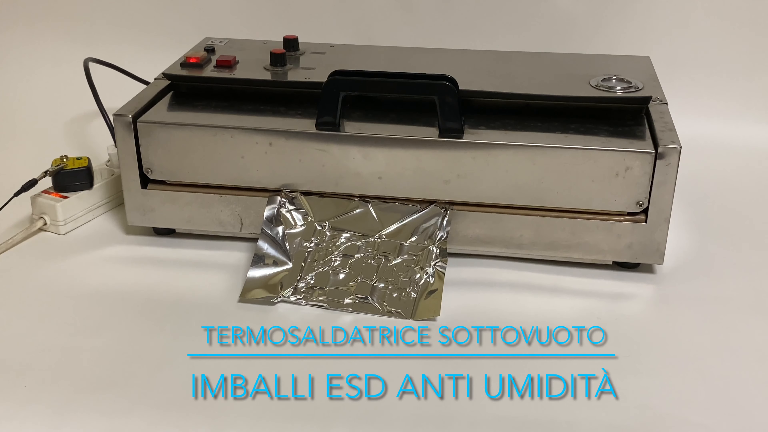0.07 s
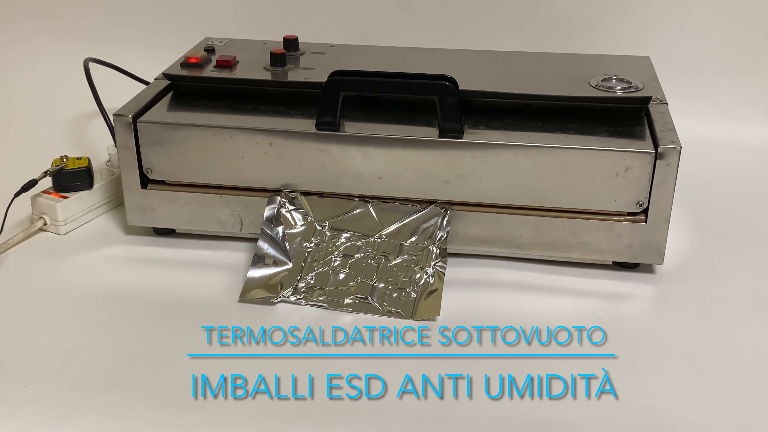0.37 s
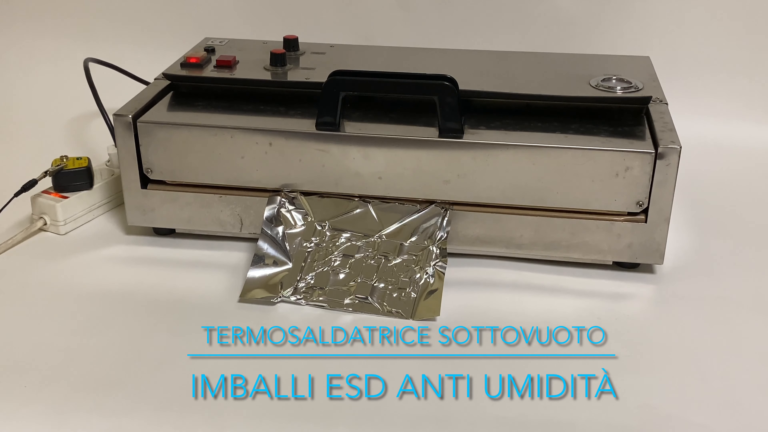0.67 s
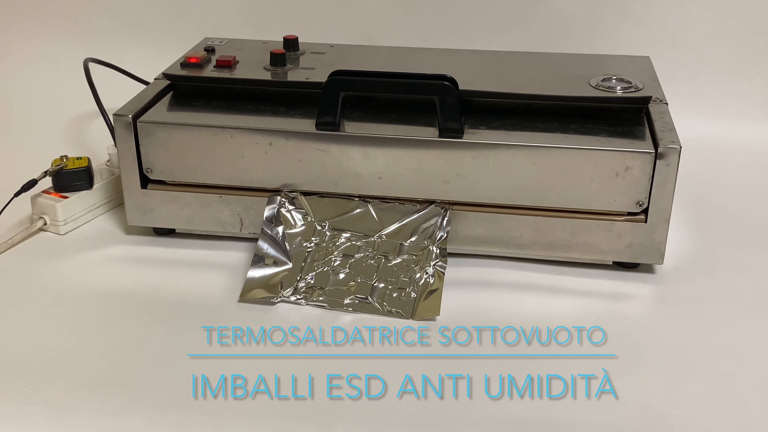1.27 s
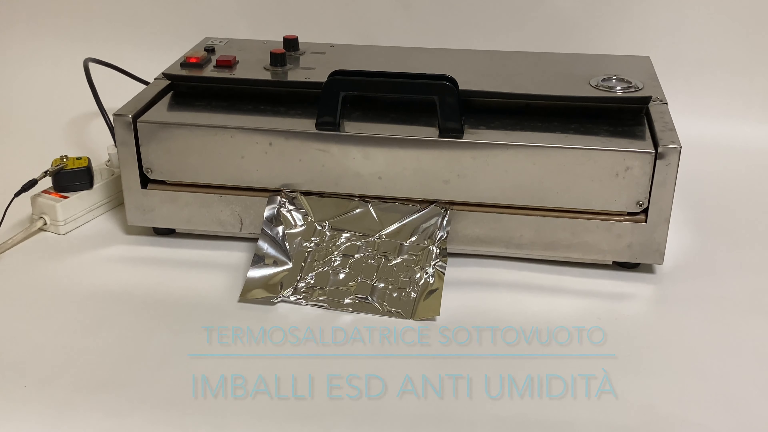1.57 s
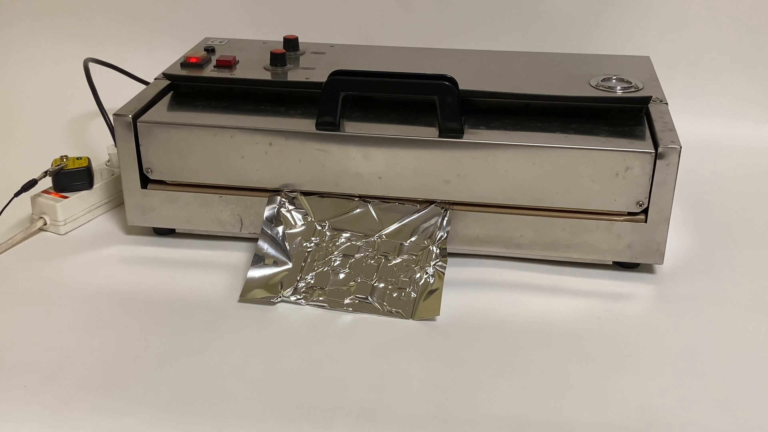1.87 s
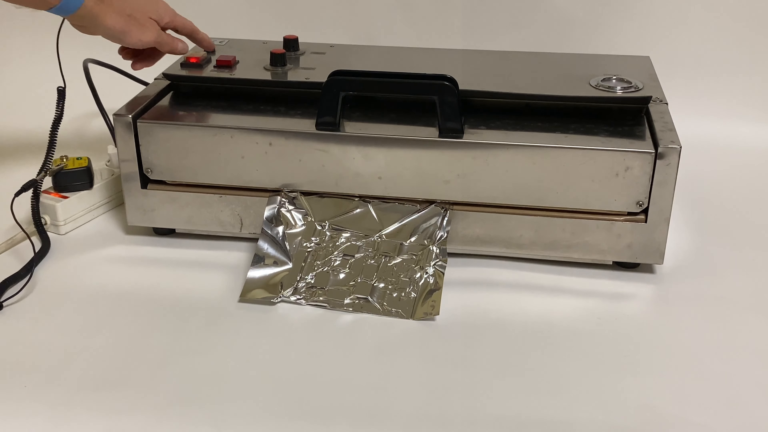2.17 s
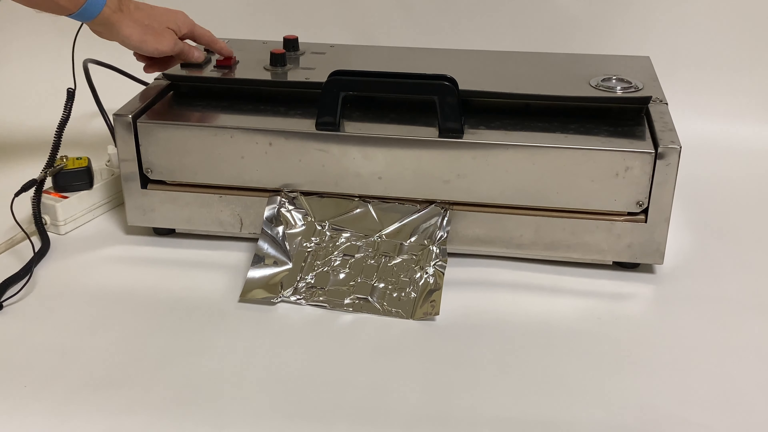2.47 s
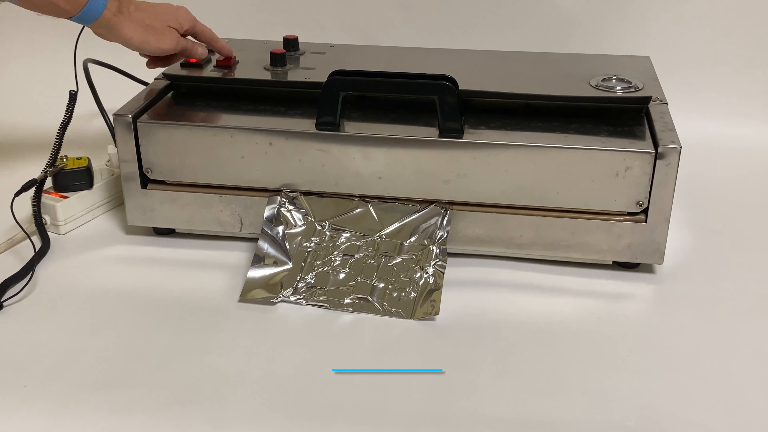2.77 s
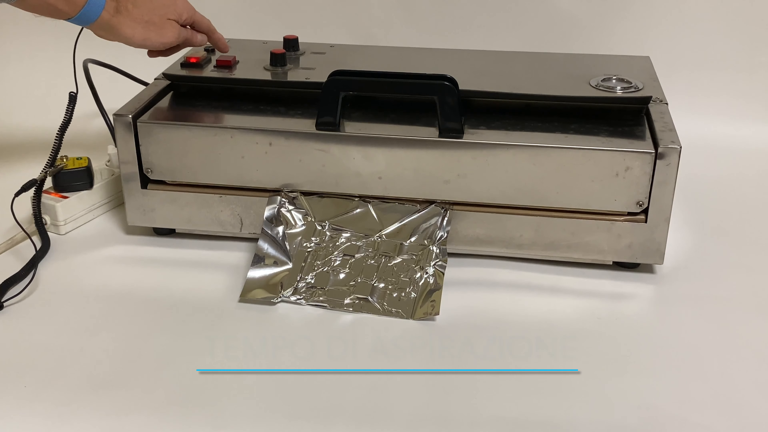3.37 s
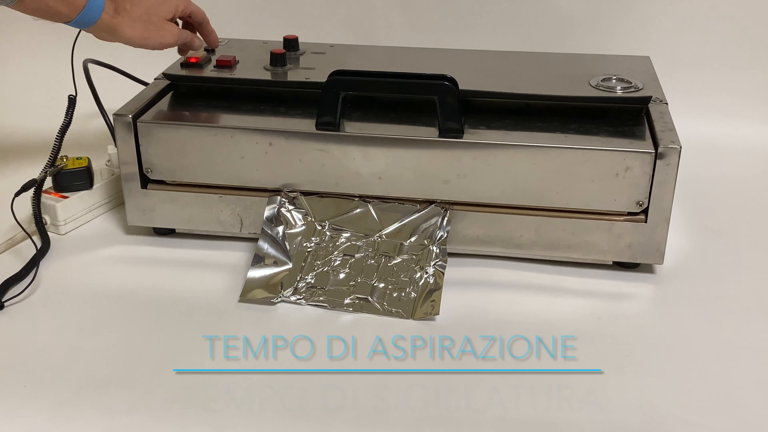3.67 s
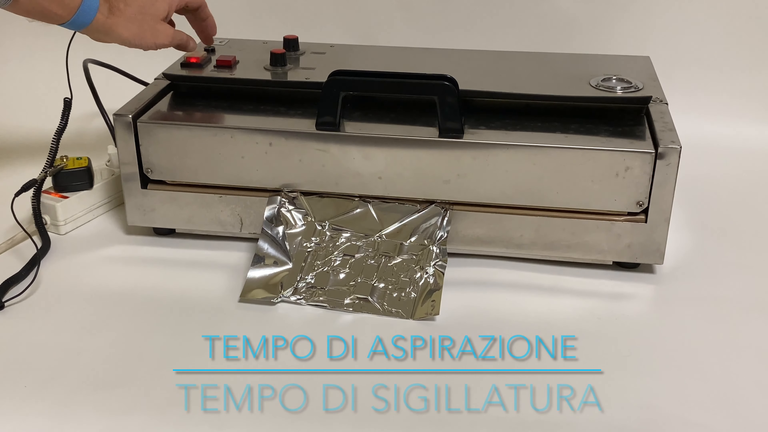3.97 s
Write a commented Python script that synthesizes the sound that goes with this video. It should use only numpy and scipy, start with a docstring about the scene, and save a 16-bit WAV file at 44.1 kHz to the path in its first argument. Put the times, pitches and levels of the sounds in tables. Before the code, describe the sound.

Steady motor hum of a vacuum sealing machine, with light rattle and a brief dip.

```python
"""A steady hum and drone: the small mains-driven pump of a steel vacuum sealer, running on a table
in a quiet room, in front of a stereo microphone. The motor hums, each turn of the shaft drones
through the case, rattles the valves and puffs air, and hum and shaft beat slowly against each other.
The foil bag ticks once; midway the level dips and the sound returns with a slightly fuller drone."""
import sys
import numpy as np
from scipy import signal
from scipy.fft import rfft, irfft, next_fast_len
from scipy.io import wavfile
from scipy.ndimage import map_coordinates

SR = 44100
rng = np.random.default_rng(int(sys.argv[2]) if len(sys.argv) > 2 else 0)


def dump_mix(stems):
    """Bounce the given channels to the path in sys.argv[1] as a 16-bit WAV at rate SR."""
    frames = np.atleast_2d(stems).T  # one column per channel
    limited = np.clip(frames, -1, 1)  # hard clip at full scale
    pcm = np.round(limited * 32767).astype(np.int16)
    wavfile.write(sys.argv[1], SR, pcm)


N = 176400

SHAFT_HZ, HUM_HZ, TOP_HZ = 46.97, 100.03, 16850
DIP_START_S, HUM_NULL_S, DIP_END_S = 1.87, 2.13, 2.42
# The pump before and after the dip. Each row: time of a stroke in seconds, time of a beat peak in
# seconds, trim of rattle, puffs and slaps in dB, trim of the hiss in dB.
STRETCHES = [(.0015, 0.048, 0.5, 0.5), (.0113, 2.45, -0.6, 0.36)]
# Noise across the microphone. Each row: frequency in Hz, left-right correlation from -1 to 1.
CORRELATION = [(50, 0.49), (300, -0.24), (900, -0.013), (2000, 1), (3300, 0.68), (5500, 1), (7500, 1),
               (8300, -0.015), (9800, 0.13), (11000, .8), (12500, -0.31), (14000, -0.89), (15600, 0.96)]

# The rush of air and room. Each row: frequency in Hz, relative density in dB.
HISS_SPECTRUM = [(20, -16), (45, 0), (130, -1.5), (300, 6), (800, 2), (1200, -8), (2300, -7), (3400, -9),
                 (5000, -8), (7800, -7.5), (8200, -9.5), (12200, -18), (13200, -18), (14200, -4.5),
                 (15550, -6), (16100, -40)]
# Modes of the foil crease. Each row: frequency in Hz, relative level in dB, 60 dB decay in seconds.
FOIL_MODES = [(5500, -5, .003), (7500, 2, .005), (10000, -5, .006), (12000, -4.5, .004), (15700, -4, .004)]
# The tick's tail in the room. Each row: frequency in Hz, relative density in dB.
TAIL_SPECTRUM = [(3000, -25), (7000, 1), (10300, 5), (13000, -12), (16000, -17)]
# The motor's magnetic hum. Each row: multiple of the hum rate, level in dB, left over right in dB.
HUM_PARTIALS = [(1, -40.1, -1.8), (2, -70, 0), (3, -72, 0), (4, -78, 0)]
# Thin whine of the steel. Each row: shaft order, relative levels in dB before and after the dip.
WHINE_ORDERS = [(40, -72, -72), (42, -73, -75), (47, -71, -73), (51, -73, -75), (60, -73, -73),
                (66, -76, -75), (68, -74, -76), (70, -73, -78), (73, -72, -73), (74, -76, -75),
                (75, -73, -71), (81, -75, -80), (82, -76, -78), (84, -75, -77), (94, -76, -80),
                (166, -82, -79)]
# Air leaving the pump. Each row: frequency in Hz, relative density in dB.
PUFF_SPECTRUM = [(200, -30), (600, -0.5), (900, 2), (1150, -3), (1350, 0), (1600, -6), (1850, -4),
                 (2300, -24), (3000, -4), (3450, -6), (4100, -10), (7000, -20.5), (12000, -42)]
# Modes of a valve. Each row: frequency in Hz, relative level in dB, 60 dB decay in seconds.
VALVE_MODES = [(3100, -6.5, .035), (3472, -0.5, 0.034), (4420, -8, 0.043)]
# Clatter of the valves. Each row: frequency in Hz, relative density in dB.
RATTLE_SPECTRUM = [(1700, -55), (1950, -9), (2600, -3), (3000, -1.5), (3450, 1.5), (4000, -3.5),
                   (4900, -4.5), (5700, -10.5), (6600, -6), (7700, -8.5), (8300, -21), (12000, -31)]

# The drone off the case. Each row: shaft order, levels in dB before and after the dip, relative
# level of its side tones in dB, left over right in dB, lead of the left side in radians.
DRONE_ORDERS = [(1, -72, -73, -84, 0, -0.2), (2, -62, -64, -82, -3, -0.6), (3, -71, -75, -79, 0, 0.1),
                (4, -63, -63, -64, -2, -0.2), (5, -44, -43, -69, -11, -0.3), (6, -45, -44, -62, 0, 0.3),
                (7, -61, -63, -63, 2, -0.6), (8, -59, -57, -65, -5, 0.4), (9, -49, -49, -64, -1, -0.0),
                (10, -50, -49, -60, 0, 1.1), (11, -55, -59, -64, -5, 2.5), (12, -62, -66, -70, 2, 1.3),
                (13, -52, -55, -60, 4, 0.6), (14, -54, -52, -65, 2, 0.3), (15, -55, -53, -64, 0, -1.0),
                (16, -60, -60, -63, -9, 0.2), (17, -55, -51, -62, -3, -1.6), (18, -48, -46, -60, 1, 0.3),
                (19, -59, -63, -64, 6, -1.6), (20, -63, -65, -72, -14, -0.6), (21, -63, -60, -70, -2, 0.8),
                (22, -65, -62, -72, -4, 0.8), (23, -70, -69, -72, -9, 0.7), (24, -85, -78, -77, 4, -1.4),
                (25, -72, -65, -74, -1, 0.8), (26, -65, -64, -71, 2, -0.5), (27, -67, -67, -75, -1, -0.5),
                (28, -63, -60, -69, -1, -0.3), (29, -71, -71, -70, 5, 1.2), (30, -75, -70, -72, -5, 1.0),
                (31, -76, -82, -77, 8, 0.1), (32, -81, -70, -77, 3, 0.3), (33, -64, -62, -76, -1, -0.0),
                (34, -70, -71, -78, 0, -0.0), (35, -67, -66, -80, 0, 0.1), (36, -81, -79, -79, 1, -0.1)]
# How steeply the drone sinks into the dip. Each row: frequency in Hz, exponent of the fade.
DRONE_FADE_POWER = [(230, 1.1), (450, 0.95), (850, 1.1), (1500, 1)]
# How far the case smears each stroke. Each row: frequency in Hz, phase spread in radians.
CASE_SMEAR = [(400, 2.2), (650, 0.79), (1700, 0.63)]
THROB_HZ, THROB_WIDTH_HZ, THROB_DEPTH = 846, 15, 0.26  # a narrow band that swells with the beat
FLUTTER_DEPTH, FLUTTER_PER_ORDER = 0.0083, 0.0023


def amp(db):
    """Decibels to gain."""
    return 10 ** (np.asarray(db) / 20)


def unit(x):
    """Scaled to rms 1."""
    return x / np.sqrt(np.mean(x ** 2) + 1e-20)


def along(points, hz):
    """(Hz, value) points read on a log axis."""
    freqs, values = np.transpose(points)
    return np.interp(np.log(hz + 1), np.log(freqs + 1), values)


def clock():
    """The time of each sample in seconds."""
    return np.arange(N) / SR


def wobble(rate):
    """A smooth random curve, rate knots a second."""
    coarse = clock()[::100]
    curve = map_coordinates(rng.standard_normal(1024), [coarse * rate], mode="wrap")
    return np.interp(clock(), coarse, curve)


def filtered(x, response):
    """x shaped by a gain that depends on frequency."""
    size = next_fast_len(N + SR // 2)
    return irfft(rfft(x, size) * response(np.fft.rfftfreq(size, 1 / SR)), size)[..., :N]


def coloured(pair, spectrum):
    """Two unrelated signals as a stereo sound of rms 1 with the given spectrum."""
    def mid_side_gains(hz):
        width = np.arccos(np.clip(along(CORRELATION, hz), -1, 1)) / 2
        return amp(along(spectrum, hz)) * [np.cos(width), np.sin(width)]
    mid, side = filtered(pair, mid_side_gains)
    return unit(np.array([mid + side, mid - side]))


def noise(spectrum):
    """Fresh stereo noise of rms 1 with the given spectrum."""
    return coloured(rng.standard_normal((2, N)), spectrum)


def tone(angle, balance_db, lead=0):
    """A sine of rms near 1, placed across the microphone by level and phase."""
    sides = np.array([[.5], [-.5]])
    return np.sqrt(2) * unit(amp(sides * balance_db)) * np.cos(angle + sides * lead)


def ring(modes, t):
    """Struck modes dying away, t seconds after the blow."""
    return sum(amp(db - 60 * t / t60) * np.sin(2 * np.pi * hz * t) for hz, db, t60 in modes)


def stroke(turns, swing_db):
    """A gain of rms 1 that peaks once a turn."""
    return unit(amp(swing_db * np.cos(2 * np.pi * turns)))


def room_hiss(trim_db):
    """Air and room rush steadily behind the machine."""
    return amp(-56 + trim_db) * noise(HISS_SPECTRUM)


def foil_tick(start_s=.4439, tail_t60_s=.19):
    """A crease of the bag snaps and the room answers briefly."""
    t = np.maximum(clock() - start_s, 0)
    snap = amp(-35) * ring(FOIL_MODES, t)
    tail = (t > 0) * amp(-55 - 60 * t / tail_t60_s) * noise(TAIL_SPECTRUM)
    return snap + tail


def motor_hum():
    """The motor's iron buzzes at twice the mains rate."""
    angle = 2 * np.pi * HUM_HZ * clock()
    return sum(amp(db) * tone(k * angle, balance_db) for k, db, balance_db in HUM_PARTIALS)


def steel_whine(turns, beat, column, trim_db=-1, beat_depth=0.44, wander_rad=0.38):
    """The steel picks out high shaft orders, heard dead centre, each swelling with the beat."""
    out = np.zeros(N)
    for row in WHINE_ORDERS:
        order, db = row[0], row[column]
        phase, beat_lag = rng.uniform(0, 2 * np.pi, 2)
        angle = 2 * np.pi * order * turns + phase + wander_rad * wobble(14)
        swell = 1 + beat_depth * np.cos(beat + beat_lag)
        out += amp(db + trim_db) * swell * np.sqrt(2) * np.cos(angle)
    return out


def air_puffs(turns):
    """Each stroke pushes out a puff of air."""
    return amp(-58) * stroke(turns, swing_db=5) * noise(PUFF_SPECTRUM)


def valve_slaps(turns, beat, spread_db=2.5, beat_db=2, jitter_s=.00015):
    """A valve slaps shut once a turn, a little unevenly, and rings briefly."""
    due = np.flatnonzero(np.diff(np.floor(turns)))
    force, delay = rng.standard_normal((256, 2))[:len(due)].T
    hits = np.clip(due + np.round(delay * jitter_s * SR).astype(int), 0, N - 1)
    slaps = np.zeros(N)
    slaps[hits] = amp(spread_db * force + beat_db * np.cos(beat[due]))
    ringing = signal.fftconvolve(slaps, ring(VALVE_MODES, clock()[:SR // 20]))[:N]
    return amp(-65) * unit(ringing)


def valve_rattle(turns, beat, beat_db=1):
    """The valves clatter the same way on every turn, a little harder on the beat."""
    turn_samples = round(SR / SHAFT_HZ)
    one_turn = rng.standard_normal((2, turn_samples))
    position = turns % 1 * turn_samples
    clatter = np.array([map_coordinates(row, [position], mode="grid-wrap") for row in one_turn])
    gain = amp(-60.5 + beat_db * np.cos(beat)) * stroke(turns, swing_db=1.1)
    return gain * coloured(clatter, RATTLE_SPECTRUM)


def ringing_phases(levels_db):
    """Minimum phase of each order when a stroke rings the case: a quick rise, then a decay."""
    log_gain = np.log(amp(np.pad(levels_db, (1, len(levels_db)), mode="edge")))
    mirrored = np.r_[log_gain, log_gain[-2:0:-1]]
    return -np.imag(signal.hilbert(mirrored))[1:]


def case_drone(turns, beat, column, fade, side_trim_db=-1, ripple_falloff=0.54):
    """The case radiates the shaft orders; the motor's torque ripple adds beating side tones."""
    out = np.zeros((2, N))
    levels_db = np.transpose(DRONE_ORDERS)[column]
    ripples = np.array([ripple_falloff ** j * np.exp(1j * (j + 1) * beat) for j in range(3)])
    for row, db, phase in zip(DRONE_ORDERS, levels_db, ringing_phases(levels_db)):
        order, _, _, side_db, balance_db, lead = row
        hz = order * SHAFT_HZ
        swell, bend = unit(np.real(np.exp(2j * np.pi * rng.random((2, 3))) @ ripples))
        in_band = np.exp(-((hz - THROB_HZ) / THROB_WIDTH_HZ) ** 2)
        throb = in_band * THROB_DEPTH * np.cos(beat)
        flutter = (FLUTTER_DEPTH + FLUTTER_PER_ORDER * order) * (wobble(30.05) + 1j * wobble(29.7))
        side_tones = amp(side_db + side_trim_db) * ((1 - in_band) * swell + 1j * bend) / np.sqrt(2)
        envelope = amp(db) * (1 + throb + flutter) + side_tones  # complex: level and phase
        smear = along(CASE_SMEAR, hz) * rng.standard_normal()
        angle = 2 * np.pi * order * turns + phase + smear + np.angle(envelope)
        out += fade ** along(DRONE_FADE_POWER, hz) * abs(envelope) * tone(angle, balance_db, lead)
    return out


def pump(stretch, fade):
    """Running before (0) or after (1) the dip; the motor's slip against the mains sets the beat."""
    stroke_s, beat_s, valve_trim_db, hiss_trim_db = STRETCHES[stretch]
    column = 1 + stretch  # this stretch's levels in the whine and drone tables
    turns = SHAFT_HZ * (clock() - stroke_s)
    beat = 2 * np.pi * (HUM_HZ - 2 * SHAFT_HZ) * (clock() - beat_s)
    valves = valve_rattle(turns, beat) + air_puffs(turns) + valve_slaps(turns, beat)
    mechanism = amp(valve_trim_db) * valves + steel_whine(turns, beat, column)
    hiss = room_hiss(hiss_trim_db)
    return fade ** 0.95 * hiss + fade * mechanism + case_drone(turns, beat, column, fade)


def scene():
    """The sealer runs on its table; midway the level dips and the hum passes through a null."""
    after_dip = np.interp(clock(), [DIP_START_S, DIP_END_S], [0, 1])
    hum_gain = np.interp(clock(), [DIP_START_S, HUM_NULL_S, DIP_END_S], [1, 0, -1])
    return pump(0, 1 - after_dip) + pump(1, after_dip) + hum_gain * motor_hum() + foil_tick()


def record(dry):
    """The sound holds nothing above TOP_HZ."""
    return filtered(dry, lambda hz: hz < TOP_HZ)


dry = scene()
out = record(dry)
dump_mix(out)
```